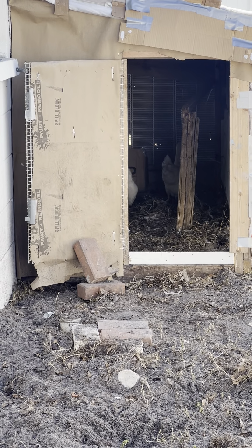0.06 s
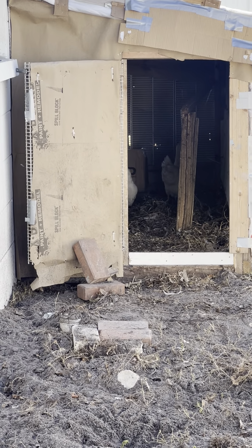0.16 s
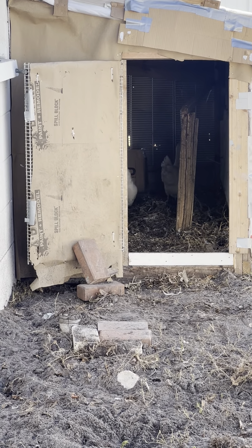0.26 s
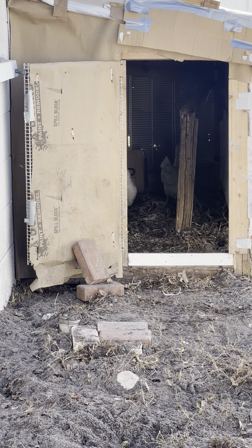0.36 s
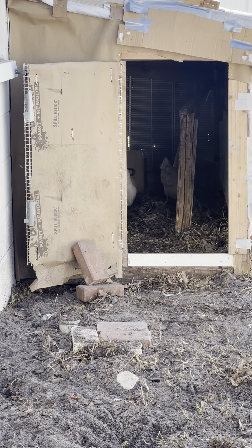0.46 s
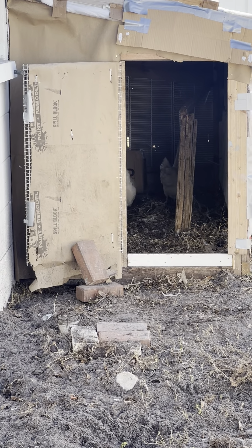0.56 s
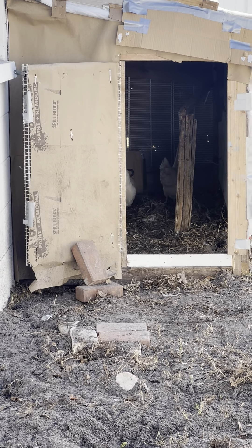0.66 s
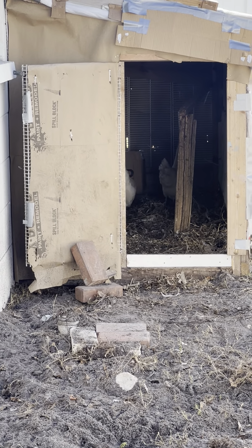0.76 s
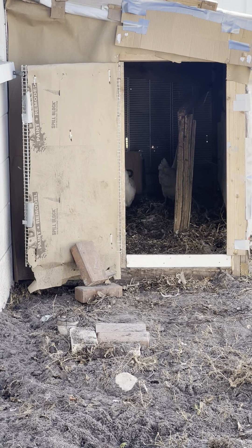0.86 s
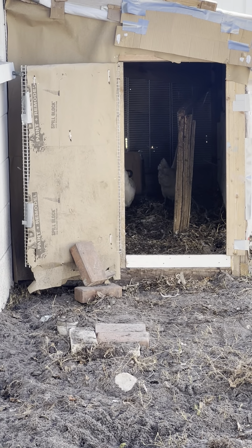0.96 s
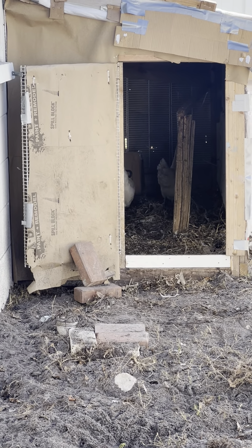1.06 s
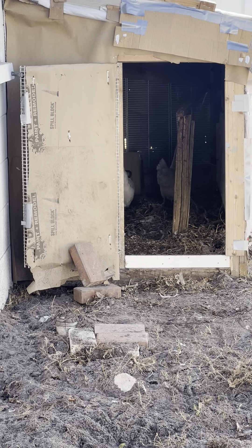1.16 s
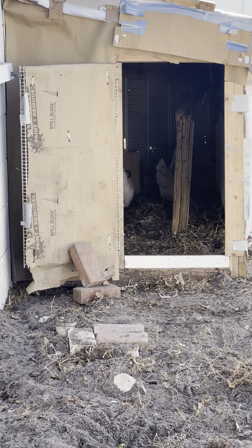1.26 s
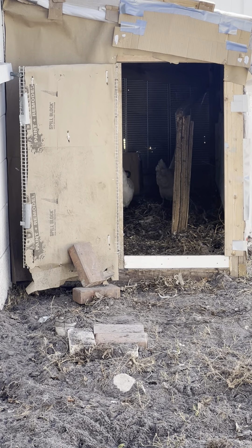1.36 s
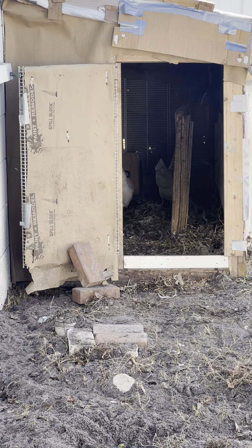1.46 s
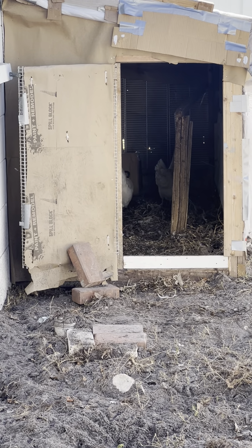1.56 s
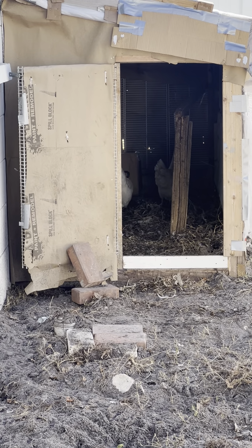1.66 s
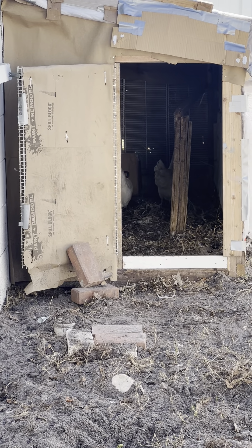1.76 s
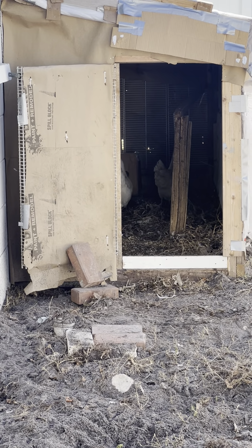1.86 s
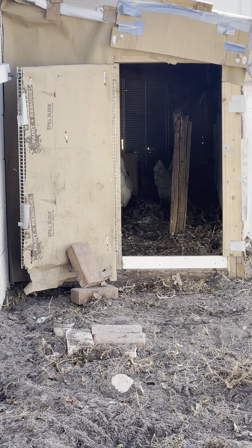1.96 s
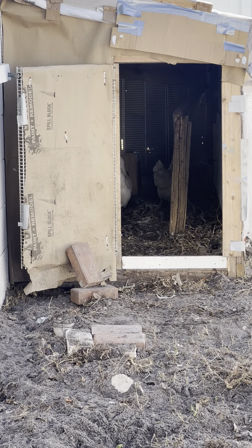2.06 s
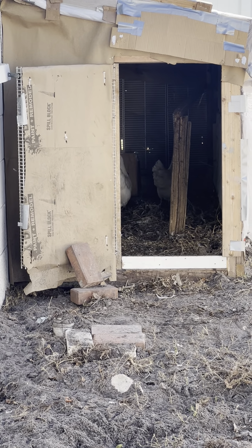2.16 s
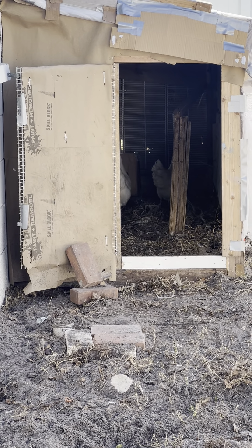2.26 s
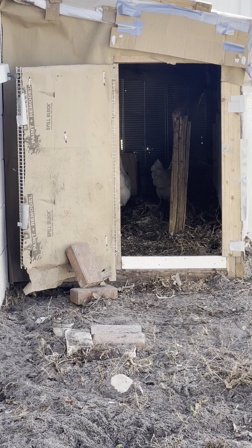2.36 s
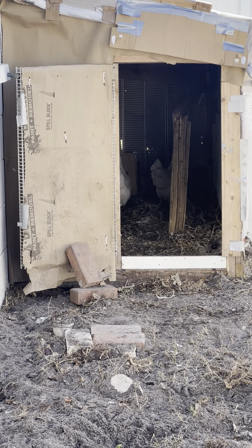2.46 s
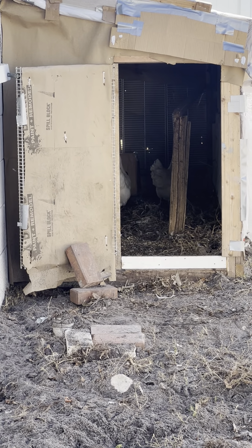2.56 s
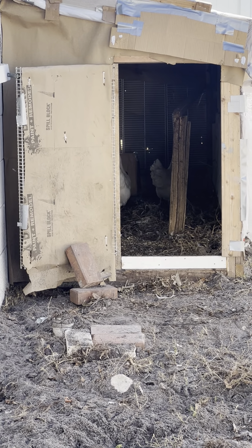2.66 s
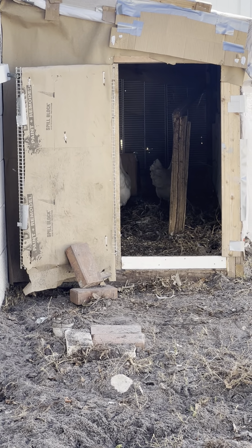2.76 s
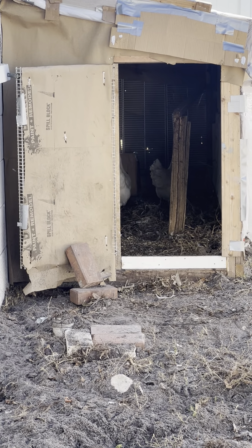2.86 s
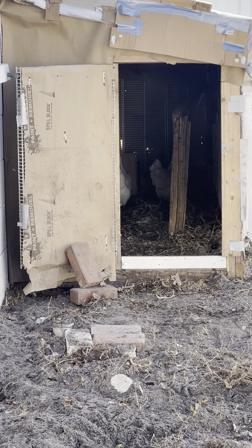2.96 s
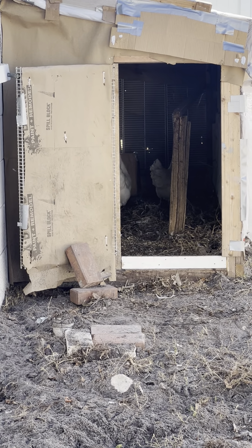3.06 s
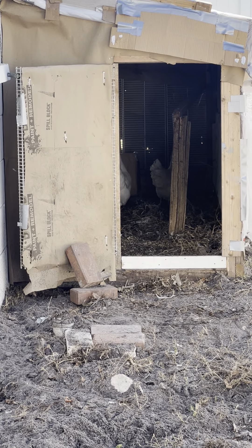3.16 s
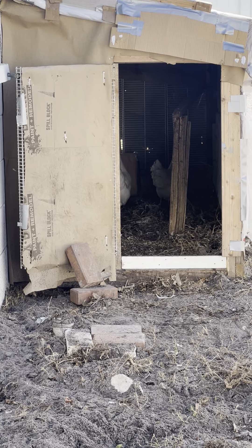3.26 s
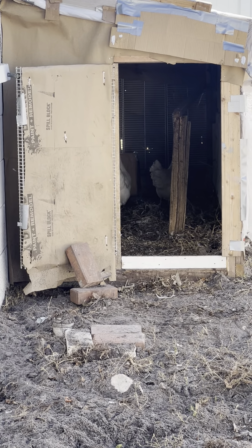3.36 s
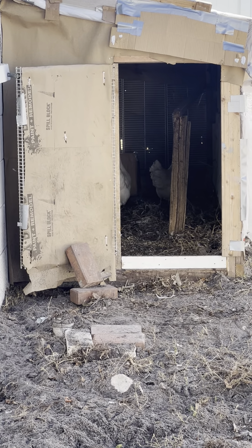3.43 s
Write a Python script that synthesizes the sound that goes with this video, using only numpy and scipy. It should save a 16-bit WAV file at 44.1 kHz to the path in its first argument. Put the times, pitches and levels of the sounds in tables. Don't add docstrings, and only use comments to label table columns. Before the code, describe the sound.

Two hens cackle inside a small wooden coop, heard from the yard through the open door, slightly left, with a short woody reverberation. From the start one hen gives hoarse, pulsing clucks, two to four a second, and ends runs with clear squawks near 0.4, 1.7, 3.2, 4.7, 5.8 and 7.8 seconds. Each squawk lasts under a fifth of a second, jumps up in pitch and breaks into a rough bark; the last is the strongest held note. A second hen mutters low and chesty between them and answers with flatter, raspier calls at 2.1, 5.5 and 8.4, the last more closed and muffled. Soft mutters finish the stretch to about 9.3. Behind, distant traffic rumbles deeply; a faint engine passes around 5.2, another surges near 7, and a third draws nearer from 7.9 as road roar and light tyre hiss rise.

```python
import sys
import numpy as np
from scipy import signal
from scipy.fft import rfft, irfft, next_fast_len
from scipy.io import wavfile
from scipy.ndimage import uniform_filter1d, map_coordinates

SR = 44100
rng = np.random.default_rng(int(sys.argv[2]) if len(sys.argv) > 2 else 0)


def voltage_ratio(decibels):
    exponent = np.asarray(decibels, float) / 20
    return 10 ** exponent


def dump_mix(stems):
    frames = np.atleast_2d(stems).T
    limited = np.clip(frames, -1, 1)
    pcm = np.round(limited * 32767).astype(np.int16)
    wavfile.write(sys.argv[1], SR, pcm)


N = 409688

# (frequency [Hz], level [dB])
SQUAWK_THROAT = [(700, -25), (1200, 0), (1750, -6.5), (2350, -8), (2950, -19), (3500, -20), (4300, -22),
                 (5500, -26), (7500, -27), (9500, -33), (11000, -39), (13000, -42)]


def squawks():
    # (time [s], length [s], held pitch [Hz], level [dB], overshoot [share of pitch])
    held_notes = [
        (0.399, 0.16, 571.7, -29, 0.03),
        (1.704, 0.17, 577.8, -28, 0.013),
        (3.219, 0.16, 573.4, -28.5, 0.037),
        (4.671, 0.13, 574, -27.5, 0.035),
        (5.811, .152, 575.3, -26.5, .1),
        (7.774, 0.14, 557, -25, 0.054),
    ]
    # (part of call [0-1], pitch [ratio], overshoot [share],
    # level [dB], beak opening [dB], brightness [dB], fundamental [dB])
    note_shape = [(0, .955, 0.093, -10, -3, -18, -15), (.11, 1, 0.95, 4.5, -8, -17, -37.5),
                  (.19, 0.96, 0.66, 0.5, -3, -12.5, -14.5), (.38, 1, .3, 0, -5.5, -15, -14),
                  (.62, 1.01, 0, -1, -11, -17, -27.5), (.82, 1.025, 0.047, -7.5, 1, -8, -19.5),
                  (1, 1.075, 0.062, 4, -8.5, -17, -10.5)]
    out = np.zeros(N)
    for *call, overshoot in held_notes:
        rows = shaped(note_shape, *call, overshoot)
        rows[:, 3] += 56 * (overshoot - .035)
        add(out, *voice(rows, SQUAWK_THROAT, jitter=0.003, rasp=0.022 + 0.8 * overshoot, puff=1.0))
    return out


def jumps():
    # (time [s], length [s], top pitch [Hz], level [dB])
    flips = [
        (.548, .052, 691, -25),
        (1.845, .054, 670.4, -25),
        (3.368, .057, 668.6, -23.5),
        (4.803, .065, 662, -23.5),
        (5.453, .03, 702, -31.5),
        (5.958, 0.042, 665, -20),
        (7.908, 0.06, 667.3, -23.5),
    ]
    # (part of call [0-1], pitch [ratio], overshoot [share], level [dB], beak opening [dB],
    # brightness [dB], fundamental [dB])
    flip_shape = [(0, 1, 0, -1.5, -20, -27, -16), (.25, .99, 0, 0, -9.5, -18, -18),
                  (.55, 1, 0, -0.5, -4, -15, -28), (1, 0.9, 0, -23.5, -8.5, -14, -1)]
    out = np.zeros(N)
    for call in flips:
        add(out, *voice(shaped(flip_shape, *call), SQUAWK_THROAT, jitter=.013, rasp=.36, puff=.1))
    return out


def answers():
    # (time [s], length [s], held pitch [Hz], level [dB], mouth resonance [Hz])
    replies = [
        (2.109, .142, 589, -31.5, 2335),
        (5.477, .135, 579.3, -32.5, 2912),
        (8.387, .16, 590, -33.5, 1250),
    ]
    # (part of call [0-1], pitch [ratio], overshoot [share], level [dB], beak opening [dB],
    # brightness [dB], fundamental [dB])
    reply_shape = [(0, 0.94, 0.13, 3, -13, -15, -22), (.12, 1, 0.96, -4.5, -3, -10, -1),
                   (.45, 1, 0.17, -1.5, -9, -14, -11.5), (.75, 1, 0, 5, -10, -19, -26.5),
                   (1, 0.97, 0, 7, -33, -22, -23)]
    # (frequency [Hz], level [dB])
    reply_throat = [(700, -9), (1200, 3), (1750, -11), (2350, -11.5), (2950, -10), (3500, -15.5),
                    (4500, -10.5), (6500, -19), (9500, -24.5), (12000, -50)]
    out = np.zeros(N)
    for *call, mouth_hz in replies:
        throat = []
        for hz, db in reply_throat:
            mouth_db = 6.5 * np.exp(-(np.log(hz / mouth_hz) / 0.043) ** 2)
            throat.append((hz, db + mouth_db))
        rows = shaped(reply_shape, *call, 0.0205)
        if mouth_hz > 1500:
            damped_db = np.linspace(0, 7.5, len(rows))[:, None]
            rows[:, 2:] += damped_db * [-1, 1, 1, 1]
            rows[:, 3] += 3.5
        else:
            rows[:, 5] -= 5.5
        add(out, *voice(rows, throat, jitter=0.0027, rasp=0.23, puff=0.2))
    return out


def shaped(shape, s, length_s, hz, db, overshoot=0):
    part, ratio, over, level_db, *colour = np.transpose(shape)
    pitch_hz = hz * (ratio + over * overshoot)
    return np.transpose([s + part * length_s, pitch_hz, db + level_db, *colour])


def voice(rows, throat, jitter, rasp, puff):
    start, (pitch_hz, db, open_db, bright_db, low_db) = curves(rows)
    size, order = len(db), np.arange(1, 23)[:, None]
    pitch_hz = pitch_hz * (1 + jitter * wobble(size, 119.0))
    phase = 2 * np.pi * np.cumsum(pitch_hz) / SR
    flutter = np.array([wobble(size, 38.4) for _ in order])
    strength = voltage_ratio(along(throat, order * pitch_hz) + 2.9 * flutter)
    tones = strength * np.cos(order * phase + .3 * order ** 2)

    gusts = rng.standard_normal(size) * (1 + np.cos(phase))
    air = unit(filtered(gusts, lambda hz: voltage_ratio(0.83 * along(throat, hz)) * (hz > 900)))
    air = (rasp + puff * np.exp(-np.arange(size) / SR / 0.012)) * air
    upper = voltage_ratio(open_db) * unit(tones[2:5].sum(0)) + voltage_ratio(bright_db) * unit(tones[5:].sum(0))
    return start, voltage_ratio(db - 2.0) * (voltage_ratio(low_db) * unit(tones[0]) + unit(tones[1]) + upper + air)


def clucks(calls, share_db):
    out = np.zeros(N)
    for s, *call in calls:
        add(out, round((s - .021) * SR), cluck(*call, share_db))
    return out


def cluck(db, throat_hz, overtone, bright_db, share_db):
    # (centre [Hz], width [Hz], level [dB])
    beak_modes = [(1700, 500, 0), (2200, 400, 0), (3150, 650, -3), (4250, 650, -4), (6500, 1400, -14),
                  (8300, 1700, -19)]
    # (frequency [Hz], level [dB])
    windpipe = [(150, -51.5), (300, -14), (780, -15.5), (930, 1), (1000, 7), (1350, 6.5), (1550, -6.5),
                (2100, -15), (4000, -36)]
    t = np.arange(round(SR / 10)) / SR
    part = np.clip(t / np.clip(.082 + .0006 * db, .03, .099), 0, 1)
    effort = np.sin(np.pi * part ** 1.2) ** 1.53
    pitch_hz = throat_hz / np.round(overtone)
    glide = 1 - .7 * (part - .45) ** 2 + .02 * wobble(len(t), 150)
    cycles = np.cumsum(pitch_hz * glide) / SR

    count = np.floor(cycles).astype(int)
    sizes = voltage_ratio(2.5 * rng.standard_normal(128) - 2.5 * (np.arange(128) % 2))
    pulses = unit(np.diff(count, prepend=0) * sizes[count % 128])
    breath = unit(rng.standard_normal(len(t)) * np.exp(-3 * (cycles % 1)))
    source = effort * (pulses + .55 * breath)

    def open_throat(f):
        return voltage_ratio(along(windpipe, f)) * (0.24 + resonance(f, throat_hz, 490))

    def shut_throat(f):
        return voltage_ratio(along(windpipe, f)) * (0.73 + resonance(f, 0.69 * throat_hz, 350))

    pose = rng.standard_normal((len(beak_modes), 2))

    def beak(f):
        response = 0
        for (hz, width_hz, mode_db), (shift, weight) in zip(beak_modes, pose):
            mode = resonance(f, hz * (1 + .055 * shift), .9 * width_hz)
            response = response + voltage_ratio(mode_db + 3 * weight) * mode ** 2
        return response

    throat = unit(filtered(source * (1 - part), open_throat) + filtered(source * part, shut_throat))
    clear = unit(effort ** 2 * np.cos(2 * np.pi * np.round(overtone) * cycles))
    clear_db = -11.5 + 0.38 * (db + 18.5)
    rasp = unit(filtered(effort * part ** .05 * (pulses + .9 * breath), beak))
    chest = unit(effort * part * np.sin(np.pi * np.round(780 / pitch_hz) * cycles))
    thump = unit(filtered(effort * breath, lambda f: resonance(f, 477, 350) ** 2))
    chest_db = share_db - 0.43 * (db + 32)

    call = unit(throat + voltage_ratio(clear_db) * clear)
    call = call + voltage_ratio(bright_db + 0.5) * rasp + voltage_ratio(chest_db - 6.0) * (1.15 * chest + 1.17 * thump)
    return voltage_ratio(db - 11.0) * call


def resonance(f, hz, width_hz):
    return 1j * f * width_hz / (hz ** 2 - f * f + 1j * f * width_hz)


def coop(x):
    # (frequency [Hz], time to fall 60 dB [s])
    decay = [(150, 0.42), (1100, 0.34), (2200, 0.35), (4000, 0.36), (9000, 0.26)]
    hz, t, z = signal.stft(rng.standard_normal((2, SR // 2)), SR, nperseg=256)
    tail = signal.istft(z * voltage_ratio(-60 * t / along(decay, hz)[:, None]), SR, nperseg=256)[1]
    tail = voltage_ratio(-4.0) * tail / np.linalg.norm(tail[0])
    late = np.pad(x, (120, 0))[None]
    wet = signal.fftconvolve(late, tail, axes=1)[:, :N]
    return wet + x * np.array([[1], [0]])


def engines():
    # (time [s], firing rate [Hz], level [dB])
    passes = [
        [(5, 62.3, -66), (5.22, 58.76, -41.5), (5.6, 61.1, -42), (5.8, 58, -63)],
        [(6.1, 88, -70), (6.81, 84.2, -42.5), (6.97, 88.4, -55), (7.07, 82.1, -38.5), (7.5, 83.7, -46)],
        [(7.3, 50.4, -57), (7.42, 50, -42), (7.69, 50.42, -47.5), (7.94, 51.17, -32.5), (8.27, 53.1, -32),
         (8.93, 55.5, -29.5), (9.29, 59.8, -30)],
    ]
    second_order_db = [-50, -79, -50]
    tones = np.zeros(N)
    for rows, second_db in zip(passes, second_order_db):
        start, (hz, db) = curves(rows)
        phase = 2 * np.pi * np.cumsum(hz) / SR
        engine = np.zeros(len(hz))
        for order, level_db in [(1, db), (2, np.minimum(db, second_db))]:
            engine += voltage_ratio(level_db + 3 + 0.38 * wobble(len(hz), 9)) * np.sin(order * phase)
        add(tones, start, engine, fade=0.021)
    return tones


def traffic():
    # (time [s], level [dB])
    flow = [(0, -42.5), (1.2, -41.5), (2, -44), (2.8, -42.5), (5, -44), (5.4, -42.5), (5.8, -42.5),
            (6.75, -38), (7, -40), (7.3, -38.5), (7.55, -40), (7.85, -37), (8.07, -43.5), (9.29, -40)]
    # (time [s], nearness [dB])
    nearness = [(0, 4), (.85, 0), (2.7, -2.5), (3.5, 2), (4.1, 3.5), (5, 1.5), (5.4, 0.5), (5.8, 6.5),
                (7.4, 8), (7.85, 12), (9.29, 13.5)]
    # (frequency [Hz], level [dB per Hz])
    rumble = [(26, -51), (44, -6), (86, -0.5), (96, -5), (108, -9.5), (132, -11), (151, -20.5),
              (167, -19.5), (220, -20), (290, -46), (480, -120)]
    roar = [(76, -26), (130, -11), (155, -7), (268, -4.5), (446, -11.5), (531, -14), (908, -12.5),
            (1220, -17.5), (3200, -35.5), (4160, -72.5), (7040, -120)]
    hiss = [(1290, -31), (2200, -11), (3470, -5.5), (3880, -6.5), (4470, -8), (6800, -10.5), (9160, -13),
            (12000, -68.5), (15600, -74), (22000, -120)]
    flow_db, near_db = curves(flow)[1][0], curves(nearness)[1][0]
    road = voltage_ratio(flow_db - 1.5) * rush(rumble, patchy_db=1.5)
    road = road + voltage_ratio(-56.5 + near_db) * rush(roar, patchy_db=2.5)
    road = road + voltage_ratio(-83.5 + 1.27 * near_db) * rush(hiss, patchy_db=1.5)
    return road + engines()


def rush(spectrum, patchy_db):
    z = signal.stft(rng.standard_normal((2, N)), nperseg=1024)[2]
    field = uniform_filter1d(rng.standard_normal(z.shape[1:]), size=5, axis=0)
    field = uniform_filter1d(field, size=8, axis=1)
    pair = signal.istft(z * voltage_ratio(patchy_db * unit(field)), nperseg=1024)[1][:, :N]
    return unit(filtered(pair, lambda hz: voltage_ratio(along(spectrum, hz))))


def unit(x):
    return x / np.sqrt(np.mean(x ** 2) + 1e-20)


def along(points, hz):
    f, v = np.transpose(points)
    return np.interp(np.log(hz + 1), np.log(f + 1), v)


def curves(rows):
    s, *cols = np.transpose(rows)
    n = np.arange(round(s[0] * SR), min(N, round(s[-1] * SR)))
    return n[0], [np.interp(n / SR, s, c) for c in cols]


def wobble(size, rate):
    return map_coordinates(rng.standard_normal(size), [np.arange(size) * rate / SR])


def filtered(x, response):
    m = next_fast_len(x.shape[-1] + 8192)
    return irfft(rfft(x, m) * response(np.fft.rfftfreq(m, 1 / SR)), m)[..., :x.shape[-1]]


def add(track, start, x, fade=0.005):
    t = np.arange(len(x)) / SR
    ends = np.clip(np.minimum(t, t[::-1]) / fade, 0, 1)
    track[start:start + len(x)] += (x * ends)[:len(track) - start]


def scene():
    # (time [s], peak level [dB], throat [Hz], overtone on the throat [number], beak brightness [dB])
    cluck_calls = [(.112, -28.5, 1134, 3, -17.5), (.328, -24.5, 1320, 2, -15.5), (.789, -24, 1136, 4, -13),
                   (1.408, -31, 990, 2, -21.5), (1.62, -25, 1330, 2, -15), (2.066, -18.5, 1153, 2, -16.5),
                   (2.92, -31.5, 1368, 4, -13), (3.152, -25.5, 1334, 6, -15), (3.57, -19, 1140, 2, -15),
                   (3.8, -25.5, 1136, 2, -12.5), (4.07, -25, 1147, 6, -15), (4.338, -23.5, 1133, 4, -14.5),
                   (4.577, -21, 1158, 2, -16), (5.728, -28, 1182, 5, -7.5), (6.149, -22.5, 1134, 2, -9),
                   (6.365, -24, 1310, 4, -12), (6.742, -27, 1302, 3, -14), (7.508, -32.5, 1144, 4, -13.5),
                   (7.714, -27, 1232, 3, -10.5), (8.131, -22, 1133, 2, -13.5)]
    mutter_calls = [(.03, -47.5, 1010, 2, -18), (.236, -44.5, 1140, 3, -4), (.99, -43, 970, 4, -16.5),
                    (1.164, -37, 1200, 5, -15.5), (1.355, -36, 1062, 5, -15.5),
                    (1.566, -36, 1277, 4, -13.5), (2.034, -36, 1115, 2, -11.5),
                    (3.739, -34, 1468, 2, -14.5), (3.944, -36.5, 988, 3, -12), (4.205, -36.5, 1095, 3, -12),
                    (4.507, -37, 1238, 2, -13.5), (5.047, -36, 1287, 4, -17), (5.37, -36, 1235, 3, -18),
                    (8.306, -37, 1065, 3, -13.5), (8.786, -35.5, 1012, 4, -12), (9.013, -37, 978, 3, -14.5),
                    (9.231, -36.5, 1137, 3, -8)]
    bark_calls = [
        (.583, -28.5, 1219, 6, -13),
        (1.89, -26, 1205, 3, -20),
        (2.253, -27, 1080, 3, -16),
        (3.414, -31, 1227, 2, -19),
        (4.854, -31, 1248, 4, -15.5),
        (5.605, -24, 1221, 2, -16.5),
        (5.989, -36, 1293, 4, 3),
        (7.959, -32, 1150, 5, -2.5),
        (8.539, -29, 1177, 4, -22.5),
    ]
    # (frequency [Hz], side over mid [dB])
    port_side = [(60, -56.5), (130, -22.5), (300, -11.5), (600, 0.5), (900, 1), (1500, -1.5), (2100, -18),
                 (2700, -45), (4000, -49.5)]
    hens = squawks() + jumps() + answers()
    hens += clucks(cluck_calls, -17.5) + clucks(mutter_calls, -8.5) + clucks(bark_calls, -21)
    near, other = coop(hens)
    road, road_other = traffic()

    hens_left = filtered(near, lambda hz: (0.65 + 0.44 * 1j) * (hz > 0))
    across = hens_left + 1.01 * other + 0.24 * road + 1.15 * road_other
    side = filtered(across, lambda hz: voltage_ratio(along(port_side, hz)))
    side += filtered(road_other, lambda hz: 0.37 * (hz > 4200))
    return np.array([near + road + side, near + road - side])


def roll_off(x):
    return signal.sosfilt(signal.butter(12, 12240, fs=SR, output="sos"), x)


def record(dry):
    # (frequency [Hz], half the phase lag between ports [rad])
    port_lag = [(3300, 0), (4200, -.25), (4750, -.7), (5000, -1.57), (5250, -2.45), (5750, -2.95),
                (6400, -3.14), (7500, -3.3), (10000, -3.85), (12500, -4.45)]
    ports = filtered(dry, lambda hz: np.exp(1j * along(port_lag, hz) * np.array([[1], [-1]])))
    return roll_off(ports)


dry = scene()
out = record(dry)
dump_mix(out)
```